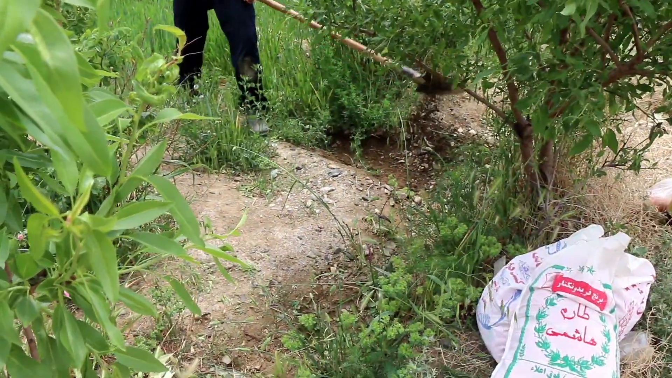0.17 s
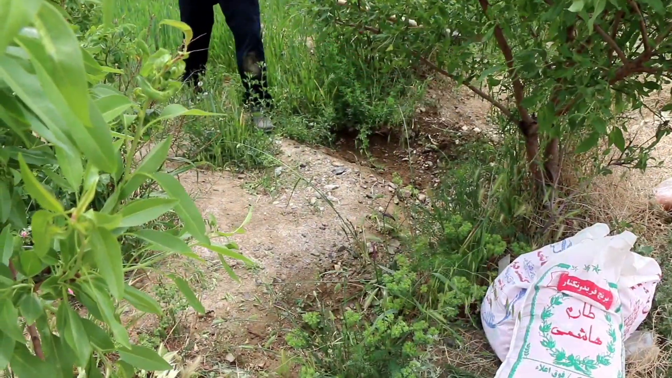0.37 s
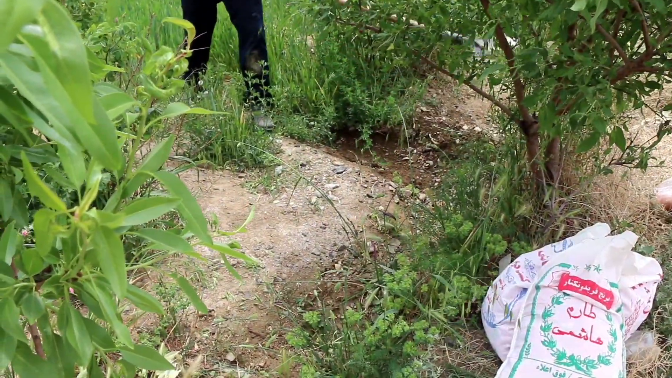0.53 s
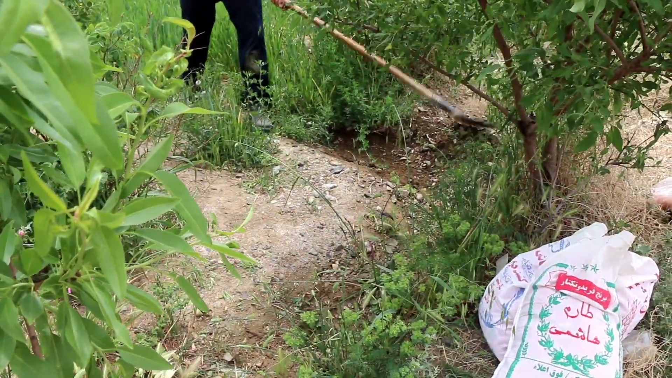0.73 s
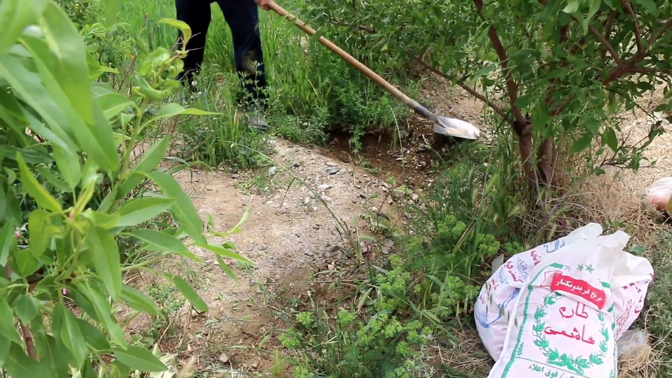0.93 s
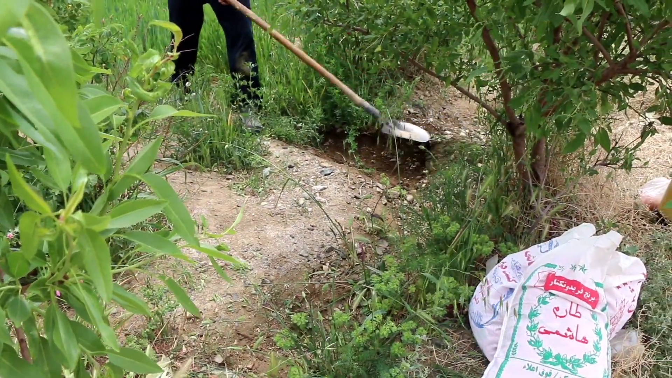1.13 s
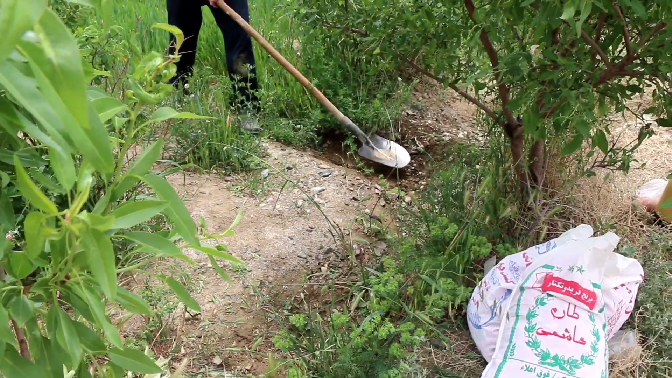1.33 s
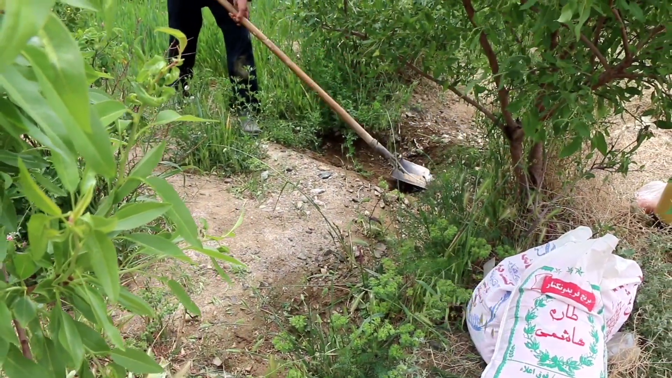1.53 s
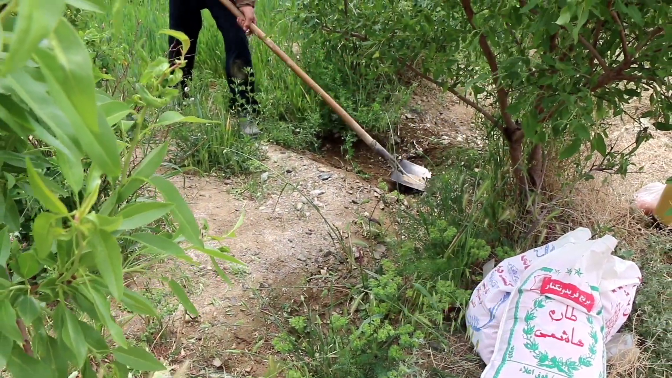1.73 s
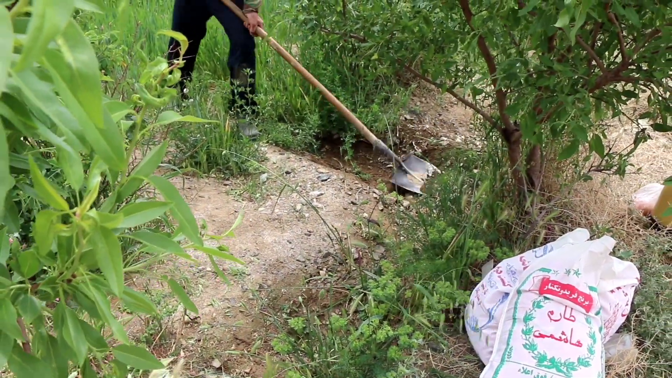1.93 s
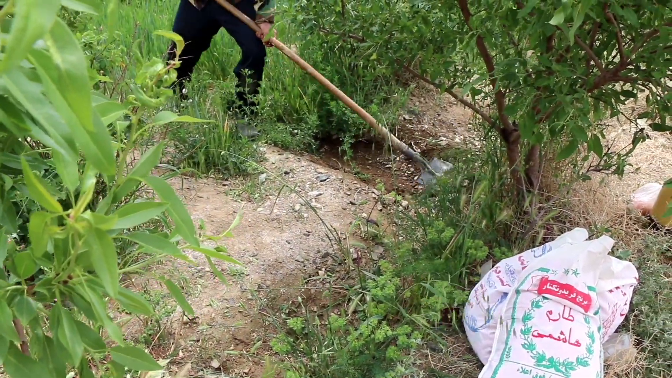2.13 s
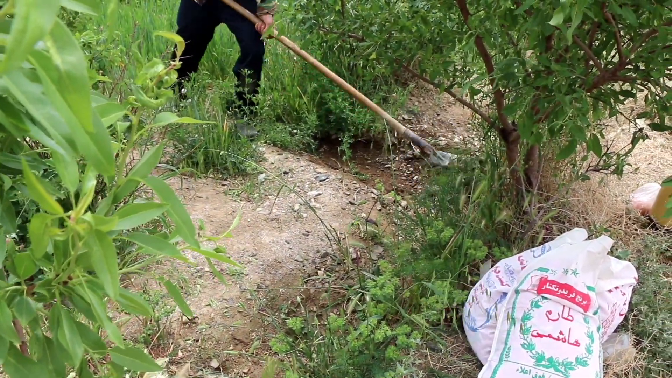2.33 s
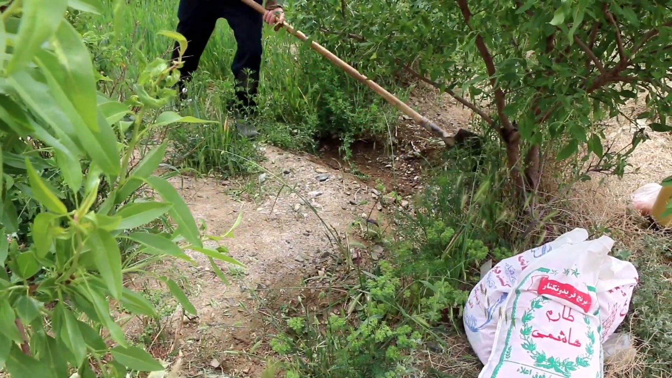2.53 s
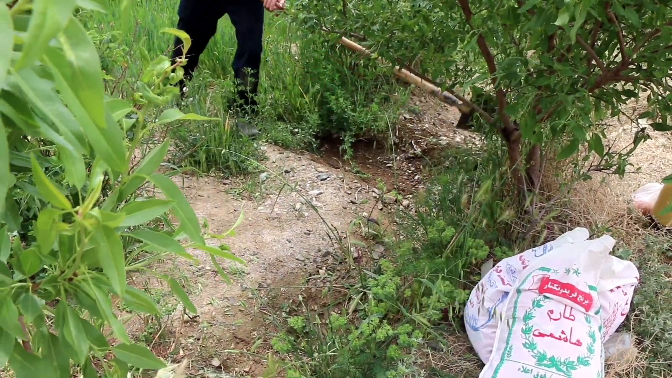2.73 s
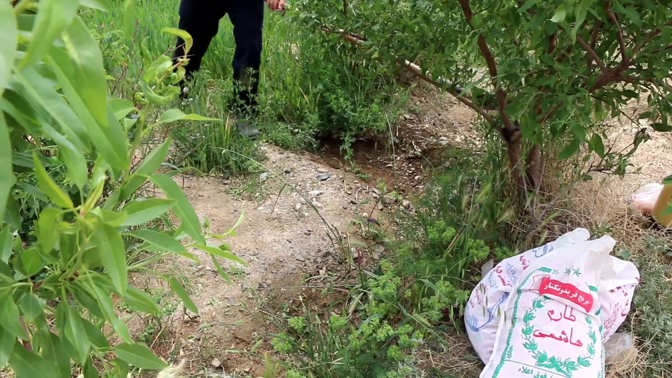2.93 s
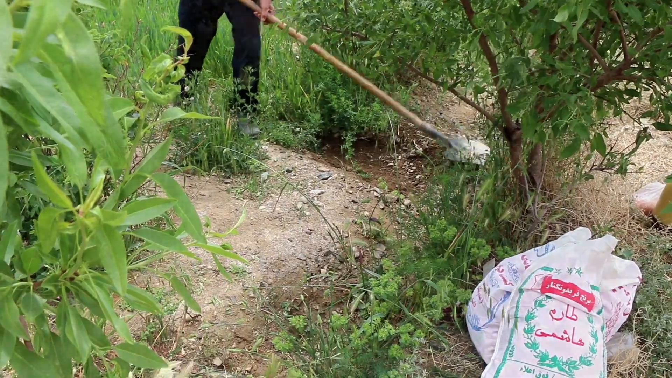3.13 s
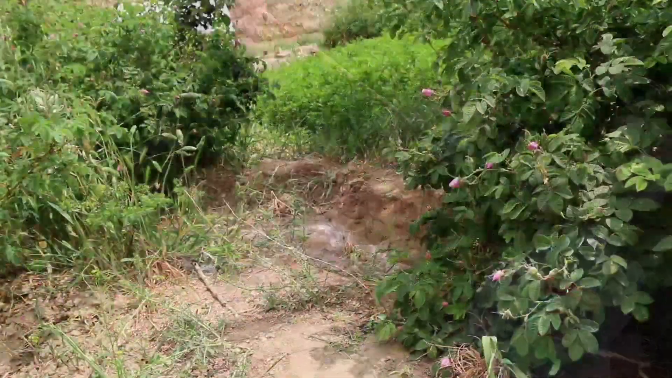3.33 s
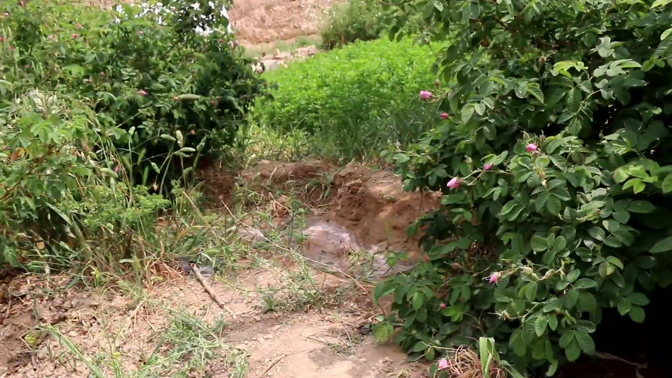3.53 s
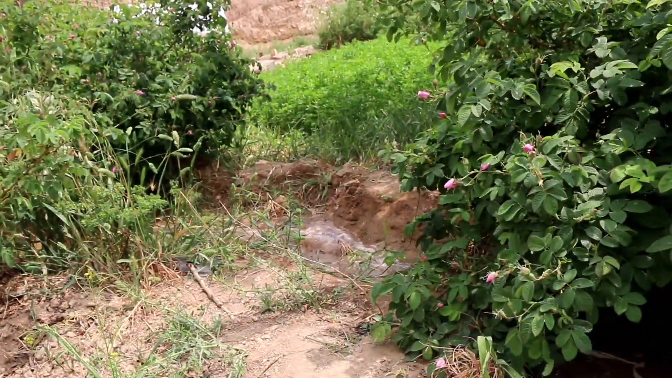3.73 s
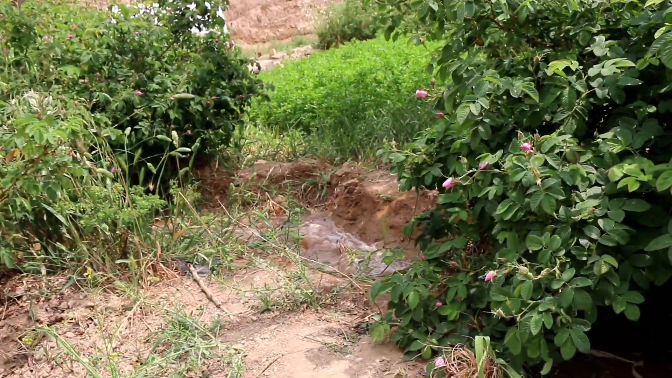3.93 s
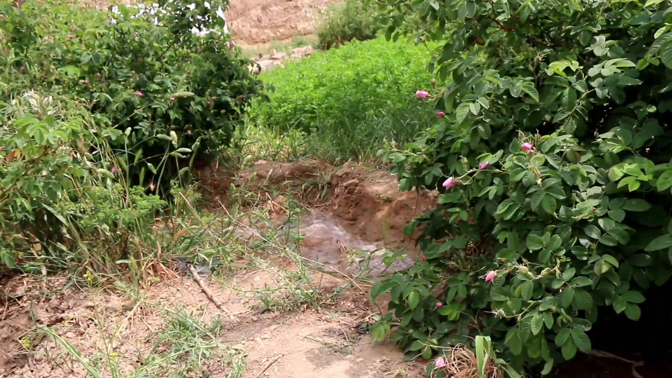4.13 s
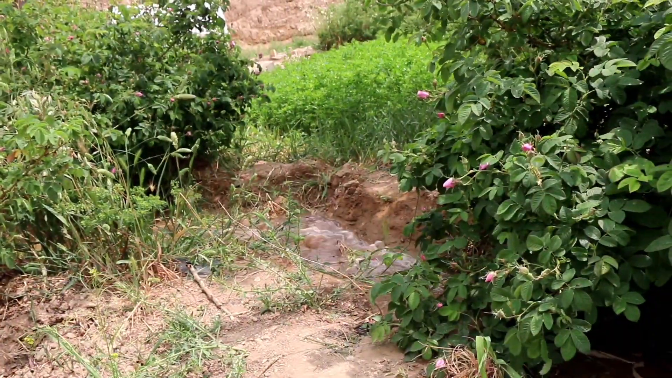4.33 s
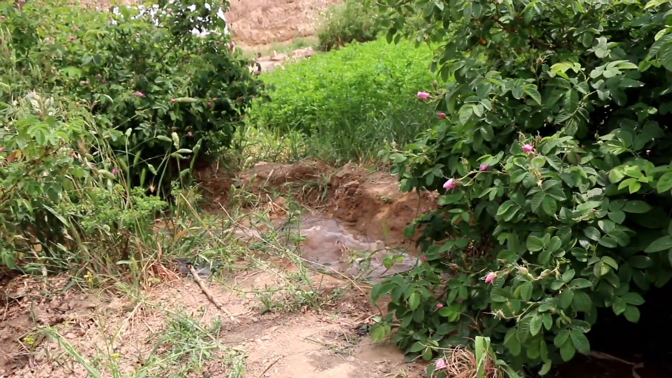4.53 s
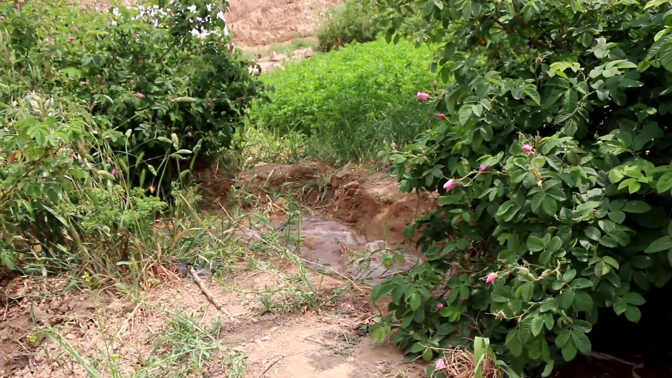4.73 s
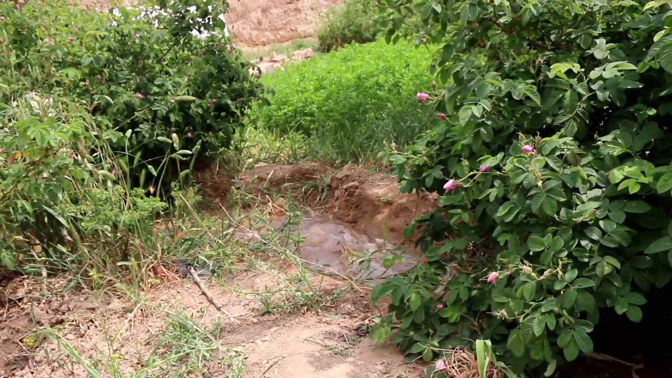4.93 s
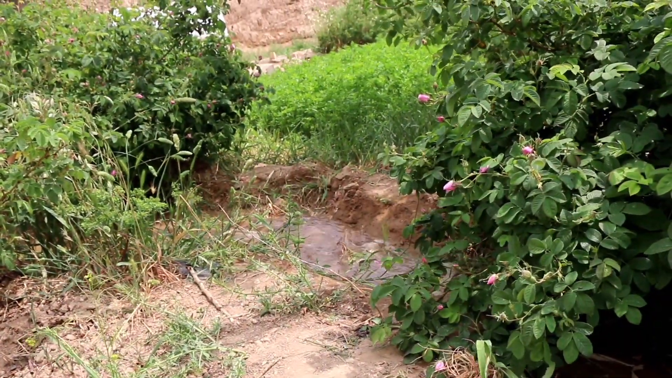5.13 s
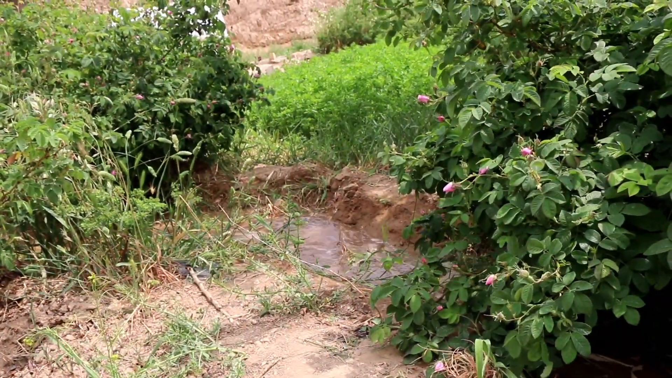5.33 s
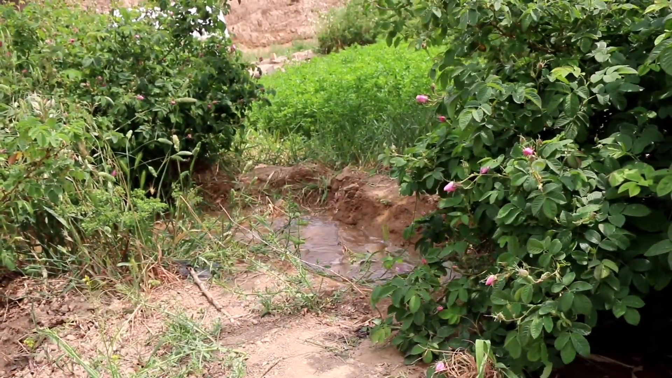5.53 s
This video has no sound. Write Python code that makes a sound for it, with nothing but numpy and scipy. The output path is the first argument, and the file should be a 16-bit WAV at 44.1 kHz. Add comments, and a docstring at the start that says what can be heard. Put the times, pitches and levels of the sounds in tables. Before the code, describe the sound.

Gritty shovel strikes and muddy thuds outdoors give way to steadily running ditch water, with light wind on the microphone.

```python
"""A steel shovel grates and stabs in wet orchard soil: grit crunches, mud thuds, the blade rings
and pings, crumbs fall. From 3 s on, irrigation water rushing along the ditch takes over,
large bubbles gurgling below, droplets and tiny bubbles fizzing above. Light wind buffets
two close microphone ports; a limiter ducks under the hardest stab."""
import sys
import numpy as np
from scipy import signal
from scipy.fft import rfft, irfft
from scipy.io import wavfile
from scipy.ndimage import uniform_filter1d, minimum_filter1d

SR = 44100
rng = np.random.default_rng(int(sys.argv[2]) if len(sys.argv) > 2 else 0)


def master(y):
    """Save y as 16-bit WAV."""
    cut = np.clip(np.atleast_2d(y).T, -1, 1)
    pcm = np.round(cut * 32767)  # scale
    wavfile.write(sys.argv[1], SR, pcm.astype(np.int16))


N = 250488
TIME = np.arange(N) / SR

# Blade hitting soil and stones. Each row: start in seconds, level in dB, bite length in ms, crumble
# decay in ms, low and high edge in Hz, relative blade ring in dB, relative mud thud in dB.
BLADE_BLOWS = [(0.115, -32.5, 1.1, 2.7, 1340, 5600, 1, -20),
               (0.3205, -23.5, 2.9, 4.9, 1610, 8300, -34, -22),
               (0.7178, -38, 6.2, 11, 1920, 5230, -8.5, -22), (0.768, -35, 3, 8, 1800, 7000, -12, -25),
               (0.7895, -4.5, 5.4, 8.2, 2120, 11000, -6, -31), (0.8105, -15.5, 5, 11, 1500, 7500, -13, -30),
               (1.4978, -16.5, 15.5, 17.4, 1220, 7900, -10, -15.5),
               (1.531, -20.5, 4.8, 22.7, 1000, 3900, -17, -11.5),
               (1.9639, -23, 3.5, 5.1, 1500, 10100, -4.5, -13),
               (1.9994, -21.5, 1.3, 2.2, 900, 5000, -23, -8),
               (2.0253, -18.5, 3.4, 20, 1500, 8100, -21, -17),
               (2.044, -20, 11.8, 3.3, 1000, 8500, -9.5, -11), (2.0887, -21.5, 1.3, 1.4, 600, 3240, -8, -6),
               (2.105, -21, 0.92, 1, 900, 4500, -16, -12), (2.3265, -28.5, 4.9, 14.5, 1190, 4060, -14, -8),
               (2.3705, -35, 5, 22, 890, 4100, -25, -17), (2.5635, -30, 3.4, 2, 1480, 5300, -2.5, -15),
               (2.7122, -30.5, 6.7, 6.5, 1500, 12900, -20, -31),
               (2.9345, -37.5, 1, 1.5, 900, 3430, -22, -5), (3.1795, -12, 6.6, 6.8, 1780, 5600, -29, -13),
               (3.246, -35, 2.3, 12, 1830, 4520, -3, -16), (3.2859, -36, 4.4, 26, 2470, 5000, -4, -20)]
# Soil-damped blade modes. Each row: frequency in Hz, relative level in dB, T60 in seconds.
BLADE_MODES = [(1477, -12, 0.14), (1728, -3.5, 0.077), (1760, -8, 0.12), (2507, -3, 0.09),
               (2742, 1.5, 0.027), (3016, 1, 0.031), (3390, -5, 0.026), (3740, -3, 0.036),
               (4140, -0.5, 0.025), (4710, -5, 0.039), (5030, -17, 0.024), (5770, -5, 0.045),
               (7320, -6, .04), (8700, -1.5, 0.038), (9690, 2.5, 0.028), (10870, 6, 0.011)]
# Blade pings and mud thocks. Each row: start in seconds, level in dB, pitch in Hz, T60 in seconds.
PINGS_AND_THOCKS = [(0.565, -40, 2600, .06), (0.7914, -33, 1750, 0.035), (0.7917, -3, 9850, 0.029),
                    (0.935, -27.5, 3750, 0.072), (1.016, -41, 2520, 0.2), (1.5066, -13.5, 1434, 0.062),
                    (1.5068, -28, 702, 0.17), (1.5132, -16, 2484, 0.043), (1.554, -19, 1260, 0.05),
                    (2.0537, -13, 1480, 0.028), (2.089, -14, 1283, 0.026), (2.089, -19, 706, 0.017),
                    (2.3278, -12, 2570, 0.019), (2.446, -31, 560, 0.019), (2.558, -20.5, 8400, 0.029),
                    (2.6, -36, 1280, .15), (3.1885, -17.5, 1740, 0.056)]
# Pushes through soil. Each row: start and length in seconds, level, growth and relative mud in dB.
SOIL_STROKES = [(0.027, 0.095, -38, 2.5, -20), (0.775, 0.05, -39.5, 1, -7), (0.911, 0.13, -40.5, 1, -13),
                (1.898, 0.036, -36, -2.5, 0), (1.98, 0.064, -35, 5, -1), (2.084, .11, -40, -2, 2.5),
                (2.282, .015, -47.5, -1, -11), (2.398, 0.13, -51.5, 4.5, -14),
                (2.562, 0.13, -37.5, 1.5, -18.5)]
# Falling crumbs. Each row: start in seconds, peak in dB, band centre in Hz.
CRUMB_TICKS = [(0.2803, -31, 6500), (0.397, -29.5, 4870), (0.4323, -27, 5450), (0.4716, -26.5, 7500),
               (0.4908, -29, 8000), (0.519, -26, 9000), (0.995, -24, 5000), (1.045, -28, 6000),
               (1.66, -31.5, 6000), (1.783, -29, 6300), (1.938, -21, 7000), (2.4496, -26, 5900),
               (2.497, -29, 7500), (2.791, -27.5, 7000)]
# Blade lifted clear. Each row: start and length in seconds, level and growth in dB.
BLADE_LIFTS = [(0.35, 0.26, -57.5, 6.5), (2.74, .16, -62.5, 14)]
# Source spectra. Each row: frequency in Hz, relative spectral density in dB.
GRIT_SPECTRUM = [(600, -17), (1000, -13.5), (1400, -1.5), (2050, -5.5), (2700, 0), (3800, -1.5), (5200, -4),
                 (7300, -6), (10000, -10.5), (12500, -12), (16000, -15.5)]
MUD_SPECTRUM = [(90, -63), (220, -7.5), (480, -16), (680, -1), (1000, -15), (1350, -5), (1900, -13),
                (3500, -31)]
GURGLE_SPECTRUM = [(90, -20), (170, -7), (230, -8), (320, -2.5), (450, -3.5), (600, -8.5), (900, -11.5),
                   (1500, -25), (3000, -72)]
SPRAY_SPECTRUM = [(400, -0.5), (800, -15), (1400, -4.5), (1700, -5.5), (2300, 1.5), (2720, -8), (3300, 1),
                  (4400, -1.5), (5200, -10), (6100, -8), (7000, -10), (8500, -12.5), (11500, -17.5),
                  (16000, -35)]
WIND_SPECTRUM = [(15, -22), (28, -9), (45, 3), (80, 5), (135, 3), (185, -3), (250, -8), (350, -15.5),
                 (700, -46)]
ORCHARD_SPECTRUM = [(15, -56), (25, -5.5), (133, -2.5), (255, -9.5), (363, -8), (488, -7), (1130, -10),
                    (1260, -9), (2100, -11.5), (5120, -16), (5550, -20.5), (12500, -20.5), (15900, -25)]
# Splash resonances. Each row: centre in Hz, width in Hz, relative level in dB.
SPLASH_BANDS = [(1030, 75, -5), (1357, 340, -9.5), (2090, 1300, -9), (3600, 120, -9), (4370, 290, -6.5),
                (5740, 120, -8.5)]
# Waves in the ditch. Each row: peak time in seconds, gain in dB, half width in seconds.
WATER_SLOPS = [(4.216, -35, 0.0029), (4.309, -36, 0.002), (5.378, -29.5, 0.0068)]
# Eddies at the ports. Each row: start and length in seconds, level in dB, left minus right in dB.
EDDIES = [(0.09, 0.077, -27, -1), (0.206, 0.017, -29, 3), (0.303, 0.091, -48.5, -9), (1.99, 0.026, -48, -8),
          (2.075, 0.13, -44, -3), (2.528, 0.061, -50.5, 6), (2.998, .08, -40.5, 6.5),
          (3.109, 0.049, -34, 15), (3.27, 0.047, -38.5, -13), (3.639, .08, -30.5, 21.5),
          (3.85, 0.13, -32.5, 10), (4.335, 0.06, -32, 16), (4.585, 0.017, -30.5, 16),
          (4.642, 0.053, -34, -10), (4.795, 0.021, -30.5, 17.5), (5.017, 0.092, -24.5, 8),
          (5.194, 0.11, -31.5, -6), (5.327, 0.042, -26, 13), (5.594, 0.047, -31.5, 13.5)]
# Trickle and rustle before the fade-out. Each row: time in seconds, level in dB.
ORCHARD_ENVELOPE = [(0, -48.5), (0.6, -49), (1.2, -46.5), (2.9, -47.5)]

STROKE_SLOPES_DB_PER_S, EDDY_SLOPES_DB_PER_S = (560, 242), (430, 260)  # rise, fall
WATER_FROM_S, WATER_FADE_S = 3.026, 0.44


def blows(attack_ms=0.3, release_ms=0.75, crumble_db=-4.5):
    """The blade bites, crushes grit, thuds in mud and rings; the soil then gives way in lumps."""
    crunch, force = np.zeros(N), np.zeros(N)
    ms = 1000 * TIME[:SR // 6]
    grit = grains(per_s=16000, spread_db=1)
    mud = unit(band(rng.standard_normal(N), 280, 860))
    lumps = unit(undb(1.5 * wander(170)))
    for k, row in enumerate(BLADE_BLOWS):
        start_s, db, bite_ms, decay_ms, low_hz, high_hz, ring_db, mud_db = row
        span = slice(k * len(ms), (k + 1) * len(ms))
        after_ms = np.maximum(ms - bite_ms, 0)
        biting = np.exp(-after_ms / release_ms)
        bite = biting * (1 - np.exp(-ms / attack_ms))
        crumble = undb(crumble_db) * (1 - biting) * np.exp(-after_ms / decay_ms) * lumps[span]
        for envelope in bite, crumble:
            crush = grit[span] * envelope
            burst = band(crush, low_hz, high_hz) + undb(-8) * band(crush, 1470, 13700)
            burst *= undb(db) * np.linalg.norm(envelope) / np.linalg.norm(burst)
            thud = undb(db + mud_db) * mud[span] * envelope
            add(crunch, start_s, burst + thud)
            add(force, start_s, undb(ring_db) * burst)
    return crunch + undb(1) * blade(force)


def blade(force):
    """Steel rings in its modes; the moving contact point favours now one, now another."""
    ring, energy = 0, 0
    for hz, db, t60_s in BLADE_MODES:
        radius, angle = decay(1 / SR, t60_s), 2 * np.pi * hz / SR
        feedback = [1, -2 * radius * np.cos(angle), radius ** 2]
        contact = unit(undb(4 * wander(25)))
        ring += undb(db) * signal.lfilter([np.sin(angle)], feedback, force * contact)
        energy += undb(db) ** 2 / (2 - 2 * radius ** 2)
    return ring / np.sqrt(energy)


def pings_and_thocks(rise_ms=0.75):
    """The steel blade pings, or a wet pocket in the mud thocks, briefly at one pitch."""
    out, t = np.zeros(N), TIME[:SR // 8]
    attack = 1 - np.exp(-1000 * t / rise_ms)
    for start_s, db, hz, t60_s in PINGS_AND_THOCKS:
        add(out, start_s, undb(db) * np.sin(2 * np.pi * hz * t) * decay(t, t60_s) * attack)
    return out


def scrapes():
    """Grit and odd pebbles catch and slip on the sliding blade; the same push squelches mud."""
    push, wet = 0, 0
    for start_s, length_s, db, growth_db, mud_db in SOIL_STROKES:
        stroke = gesture(start_s, length_s, db, growth_db, *STROKE_SLOPES_DB_PER_S)
        push += stroke
        wet += undb(mud_db) * stroke
    catch = undb(1.8 * wander(160))
    sand = grains(per_s=9000, spread_db=2.8)
    pebbles = grains(per_s=300, spread_db=2.2)
    grit = push * catch * colour(sand + 0.5 * pebbles, GRIT_SPECTRUM)
    mud = wet * colour(grains(per_s=600, spread_db=2), MUD_SPECTRUM)
    return undb(-1) * grit + undb(-6.5) * blade(grit) + undb(-2) * mud


def crumbs(decay_s=0.0017, tail_s=0.011, edge_ratio=1.9):
    """Dry crumbs tick on leaves and ground, each at its own pitch."""
    out, t = np.zeros(N), TIME[:SR // 30]
    envelope = np.exp(-t / decay_s) + 0.19 * np.exp(-t / tail_s)
    for start_s, db, hz in CRUMB_TICKS:
        tick = band(rng.standard_normal(len(t)) * envelope, hz / edge_ratio, hz * edge_ratio, order=1)
        add(out, start_s, undb(db) * tick / np.abs(tick).max())
    return out


def lifted_blade(hz=1775):
    """Clear of the soil, the blade hums in one mode as grit slides off."""
    sliding = sum(gesture(*lift, *STROKE_SLOPES_DB_PER_S) for lift in BLADE_LIFTS)
    return sliding * unit(band(grains(per_s=400, spread_db=-0.5), hz - 28, hz + 28))


def ditch(growth_db_per_s=0.37):
    """Water tumbles over a step, gurgling, splashing and slopping; a second patch splashes beyond."""
    plops = grains(per_s=2900, spread_db=3)
    large_bubbles = bubbles(174.8, 1065, cycles=5.5, spread_db=-0.4, count=5000)
    gurgle = colour(large_bubbles + 0.76 * plops, GURGLE_SPECTRUM)
    splash = splashing()
    flow = water_share() * undb(-30 + growth_db_per_s * (TIME - WATER_FROM_S))
    slop = sum(undb(db) * np.exp(-np.abs(TIME - peak_s) / half_s) for peak_s, db, half_s in WATER_SLOPS)
    step = flow * (undb(-0.93 + 0.083 * wander(6.4)) * gurgle + undb(-7) * splash)
    step += band(slop * splash, 1300, 7900)
    beyond = flow * undb(-10) * splashing()
    return ports(step, lag_ms=-0.064, pan_db=-1.4) + ports(beyond, lag_ms=-0.026, pan_db=-1)


def splashing():
    """One patch of broken water: droplets, tiny bubbles and broad resonances."""
    fizz = bubbles(933, 7530, cycles=13.6, spread_db=4.5, count=4000)
    spray = colour(grains(per_s=7000, spread_db=3) + 0.32 * fizz, SPRAY_SPECTRUM)
    drops = grains(per_s=5000, spread_db=3)
    hollows = sum(undb(db) * band(drops, hz - width_hz / 2, hz + width_hz / 2, order=1)
                  for hz, width_hz, db in SPLASH_BANDS)
    return (spray + undb(-3.5) * unit(hollows)) * undb(1.33 * wander(30))


def bubbles(low_hz, high_hz, cycles, spread_db, count, glide=0.24):
    """Air pockets ring down, rising in pitch as they near the surface; rms 1."""
    out = np.zeros(N)
    for when, pitch, size in rng.random((count, 3)):
        hz = low_hz * (high_hz / low_hz) ** pitch
        t = TIME[:int(2 * cycles / hz * SR)]
        age = t * hz / cycles
        envelope = undb(-spread_db * np.log(0.01 + size)) * np.exp(-np.pi * age)
        add(out, when * TIME[-1], envelope * np.sin(2 * np.pi * hz * t * (1 + glide * age)))
    return unit(out)


def wind(breeze_db=-39.5, breeze_pan_db=-1.5, wander_db=4.5):
    """Eddies thump each port separately; a wandering breeze fades in with the water."""
    out = np.zeros((2, N))
    for port, side in zip(out, (0.5, -0.5)):
        eddy_power = sum(gesture(start_s, length_s, db + side * pan_db, 0, *EDDY_SLOPES_DB_PER_S) ** 2
                         for start_s, length_s, db, pan_db in EDDIES)
        breeze = water_share() * undb(breeze_db + side * breeze_pan_db + wander_db * wander(17))
        port += np.sqrt(eddy_power + breeze ** 2) * colour(rng.standard_normal(N), WIND_SPECTRUM)
    return out


def orchard():
    """Faint trickle and rustle around the digging, giving way to the rushing water."""
    near = colour(grains(per_s=5000, spread_db=3.5), ORCHARD_SPECTRUM) * undb(0.81 * wander(6.5))
    around = np.array([colour(rng.standard_normal(N), ORCHARD_SPECTRUM) for _ in range(2)])
    gain = undb(np.interp(TIME, *np.transpose(ORCHARD_ENVELOPE))) * (1 - water_share())
    return gain * (ports(near, lag_ms=0.036, pan_db=-3) + undb(-6) * around)


def foliage(x, t60_s, db):
    """Short scatter off leaves and ground, one tail per port."""
    t = TIME[:SR // 4]
    tails = band(rng.standard_normal((2, len(t))), 900, 8500, order=1) * decay(t, t60_s)
    return undb(db) * np.array([through(x, tail / np.linalg.norm(tail)) for tail in tails])


def ports(x, lag_ms, pan_db):
    """Two close ports: the left hears x lag_ms later and pan_db louder."""
    half_lag = np.exp(-1j * np.pi * np.fft.rfftfreq(N, 1 / SR) * lag_ms / 1000)
    spectrum = rfft(x)
    left = irfft(spectrum * half_lag, N) * undb(pan_db / 2)
    right = irfft(spectrum / half_lag, N) * undb(-pan_db / 2)
    return np.array([left, right])


def water_share():
    """Crossfade from orchard (0) to ditch (1)."""
    return np.clip((TIME - WATER_FROM_S) / WATER_FADE_S, 0, 1)


def gesture(start_s, length_s, db, growth_db, rise_db_per_s, fall_db_per_s):
    """Gain that reaches db at start_s, changes by growth_db over length_s, then falls."""
    age_s = TIME - start_s
    edges_db = rise_db_per_s * np.maximum(-age_s, 0) + fall_db_per_s * np.maximum(age_s - length_s, 0)
    return undb(db + growth_db * np.clip(age_s / length_s, 0, 1) - np.minimum(edges_db, 120))


def grains(per_s, spread_db):
    """Tiny random impacts of uneven size; rms 1."""
    size = undb(spread_db * np.minimum(rng.exponential(size=N), 5))
    return unit((rng.random(N) < per_s / SR) * size * rng.choice([-1, 1], N))


def wander(per_s):
    """Smooth random drift; rms 1."""
    hold = max(int(SR / per_s), 1)
    steps = np.repeat(rng.standard_normal(N // hold + 1), hold)
    return unit(uniform_filter1d(steps, hold)[:N])


def colour(x, spectrum, size=4096):
    """Minimum-phase filter with the given spectrum; output rms 1."""
    hz, db = np.transpose(spectrum)
    bins_hz = np.maximum(np.fft.rfftfreq(size, 1 / SR), 1)
    gain = undb(np.interp(np.log(bins_hz), np.log(hz), db))
    cepstrum = irfft(np.log(gain))
    cepstrum[1:size // 2] *= 2
    cepstrum[size // 2 + 1:] = 0
    return unit(through(x, irfft(np.exp(rfft(cepstrum)))))


def band(x, low_hz, high_hz, order=2):
    """Band-pass."""
    high_hz = min(max(high_hz, 1.02 * low_hz), 0.45 * SR)
    return signal.sosfilt(signal.butter(order, [low_hz, high_hz], "band", fs=SR, output="sos"), x)


def through(x, response):
    """Convolve, keeping the length of x."""
    return signal.fftconvolve(x, response)[:len(x)]


def add(track, start_s, sound):
    """Mix in at start_s."""
    i = int(start_s * SR)
    track[i:i + len(sound)] += sound[:N - i]


def decay(t, t60_s):
    """Gain falling 60 dB per t60_s."""
    return np.exp(-np.log(1000) * t / t60_s)


def undb(db):
    """Decibels to gain."""
    return 10 ** (np.asarray(db) / 20)


def unit(x):
    """Scale to rms 1."""
    return x / np.sqrt(np.mean(x ** 2) + 1e-20)


def scene():
    """Shovel slightly right, then the ditch; orchard and wind behind."""
    shovel = blows() + pings_and_thocks() + scrapes() + crumbs() + lifted_blade()
    direct = ports(shovel, lag_ms=0.028, pan_db=-3)
    return direct + foliage(shovel, t60_s=0.36, db=-26) + ditch() + orchard() + wind()


def record(dry, threshold=1.27, release_s=0.1, top_hz=15900):
    """A limiter ducks at the loudest peaks and recovers; then clipping and a low-pass."""
    excess = np.log(np.maximum(np.abs(dry).max(axis=0) / threshold, 1))
    # Peak hold with exponential release.
    release = TIME / release_s
    reduction = np.exp(np.maximum.accumulate(np.log(excess + 1e-12) + release) - release)
    gain = uniform_filter1d(minimum_filter1d(np.exp(-reduction), size=45), size=45)
    lowpass = signal.ellip(8, 0.2, 70, top_hz, fs=SR, output="sos")
    return signal.sosfilt(lowpass, np.clip(dry * gain, -0.9, 0.9))


dry = scene()
out = record(dry)
master(out)
```